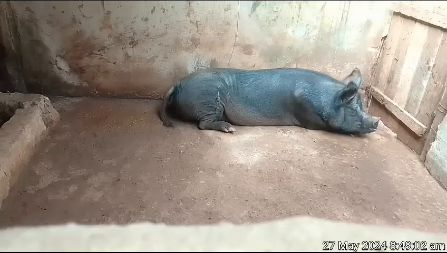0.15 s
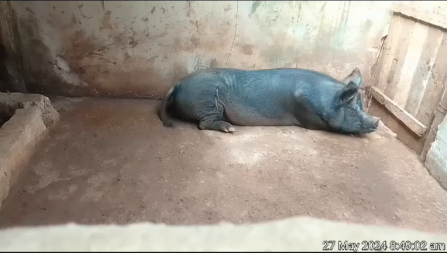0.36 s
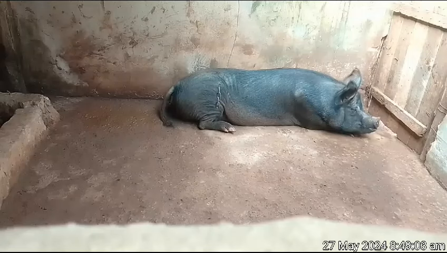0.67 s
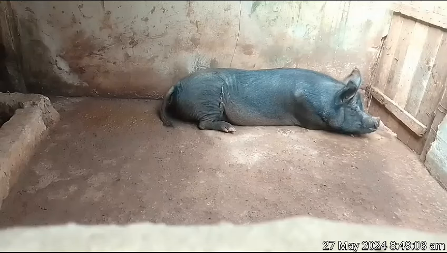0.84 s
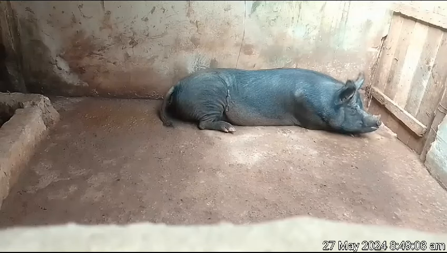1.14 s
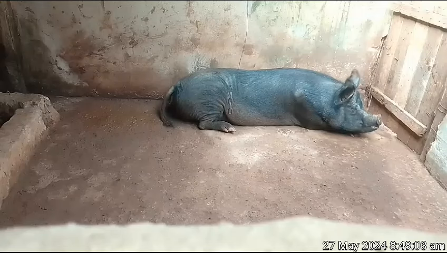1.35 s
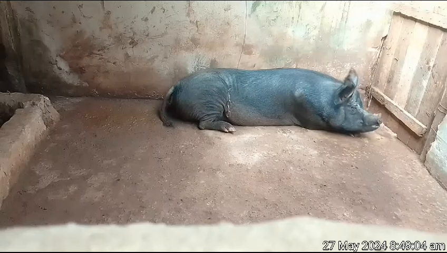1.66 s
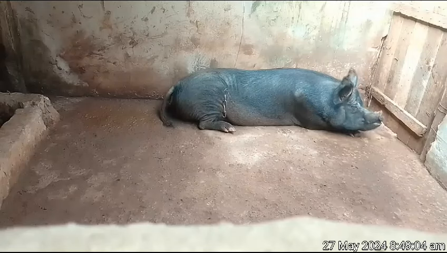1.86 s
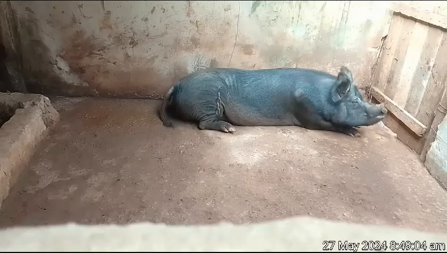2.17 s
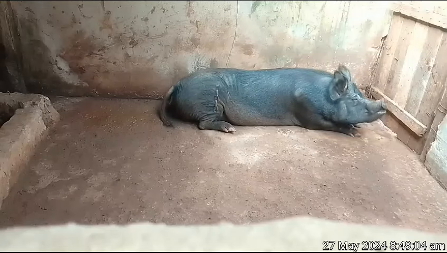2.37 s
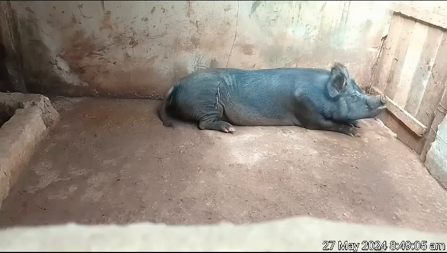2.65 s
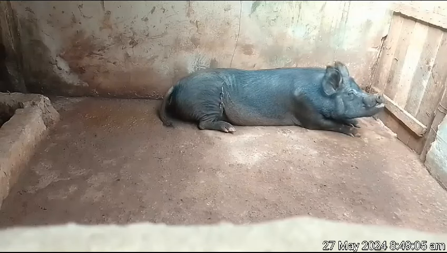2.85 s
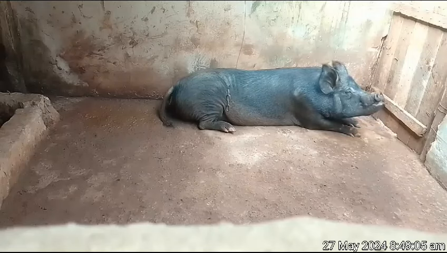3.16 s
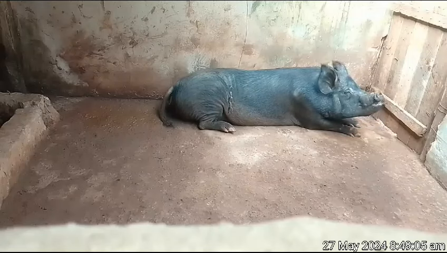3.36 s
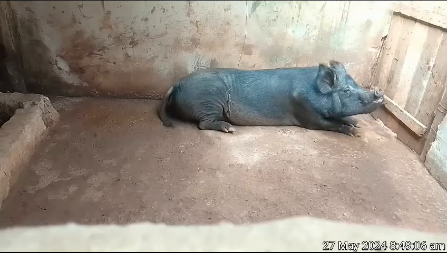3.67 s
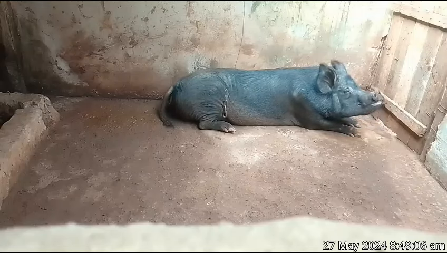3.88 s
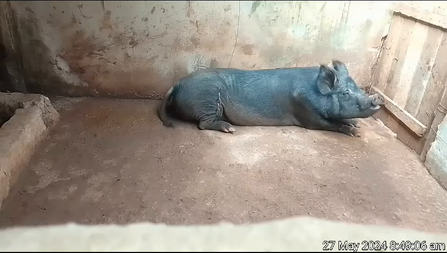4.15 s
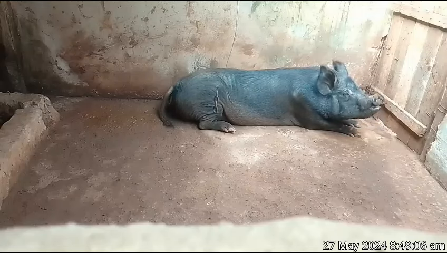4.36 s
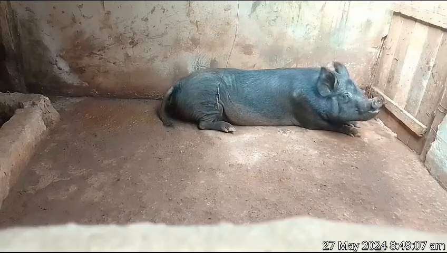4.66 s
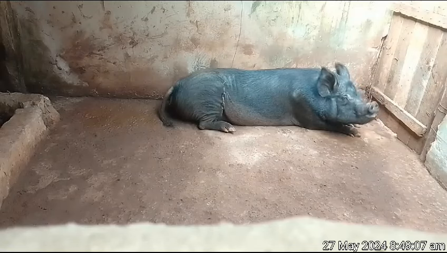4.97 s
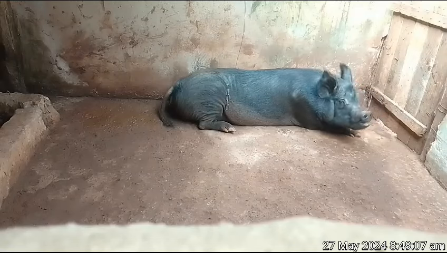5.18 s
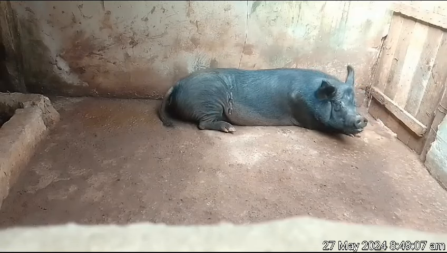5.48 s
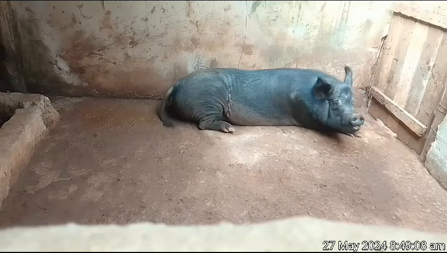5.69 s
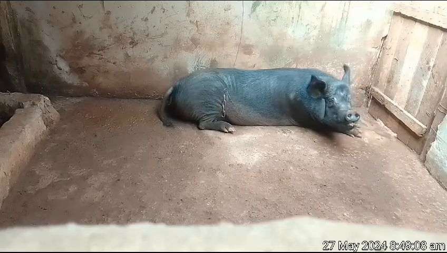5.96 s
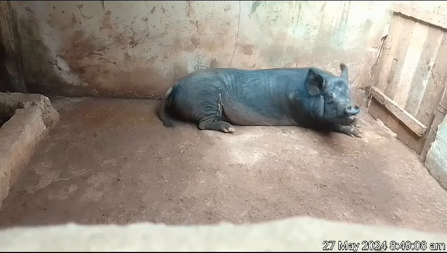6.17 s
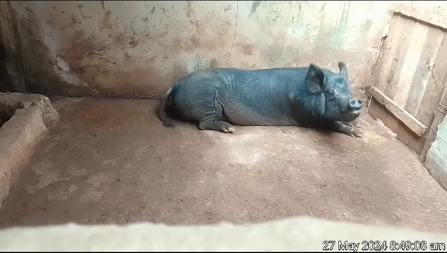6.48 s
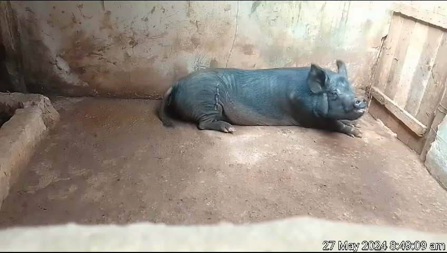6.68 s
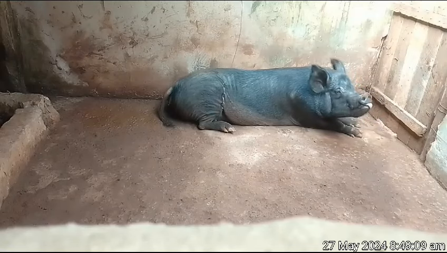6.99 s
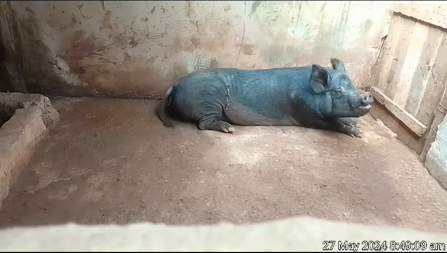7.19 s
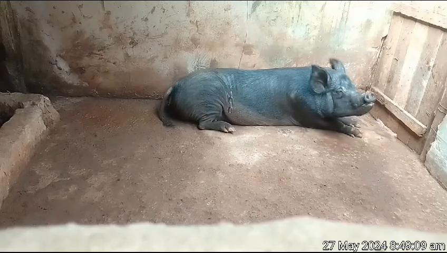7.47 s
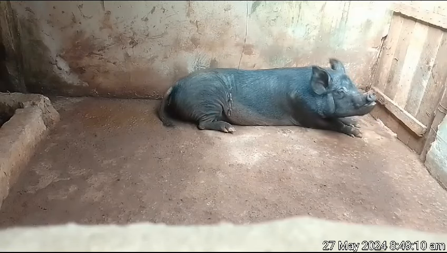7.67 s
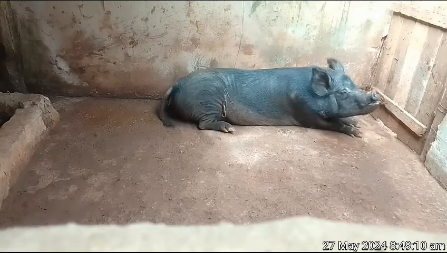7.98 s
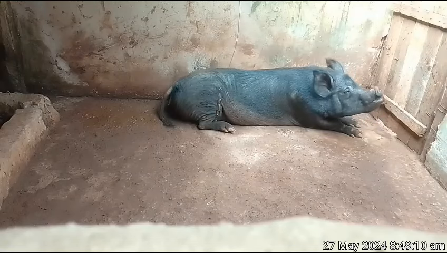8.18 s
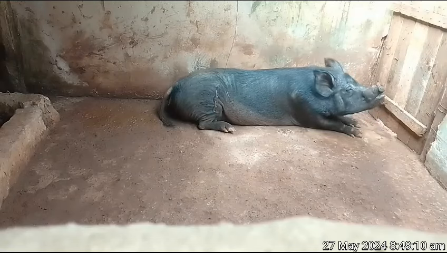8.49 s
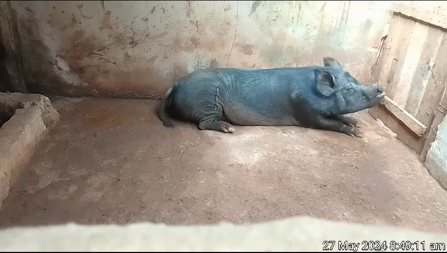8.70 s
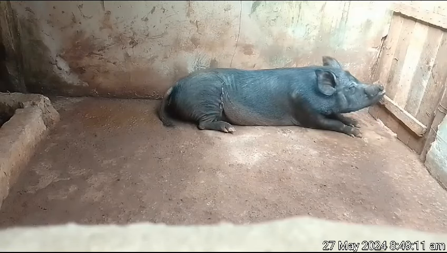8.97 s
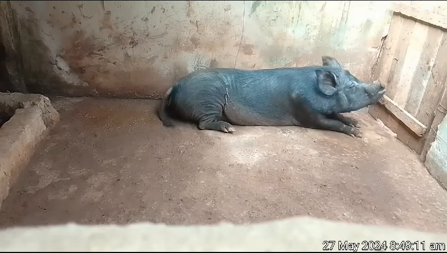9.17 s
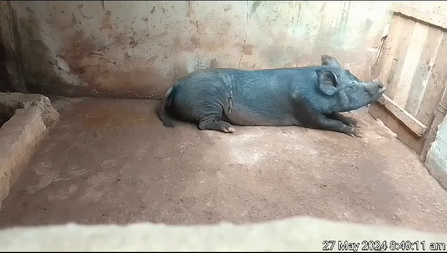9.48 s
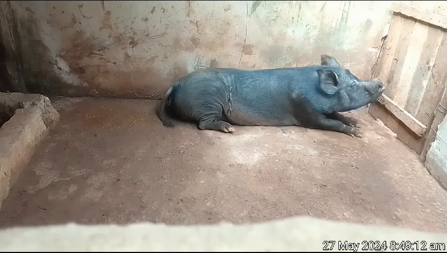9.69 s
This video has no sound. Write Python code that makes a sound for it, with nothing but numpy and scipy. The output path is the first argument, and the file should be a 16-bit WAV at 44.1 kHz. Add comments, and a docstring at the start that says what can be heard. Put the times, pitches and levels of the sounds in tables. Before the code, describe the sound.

One pig grunts continually in a small hard-walled pen: hoarse, breathy, mostly unpitched snorts with a rattling mid-range throat tone, little wet clicks and occasional lip smacks. Early grunts are mixed, one sharp and strong near the first second; the middle is firm and regular, the later ones quieter and rougher with a strong final one. Faint low farm rumble wavers underneath; slightly bright, close phone pickup with half-second room ring.

```python
"""A low, wavering farm murmur is heard first; then a pig gives short, hoarse grunts, two or three a second.
Murmur: filtered noise. Grunt: unevenly timed tissue slaps and puffs of air excite the throat resonances.
Gushes of air mark the pops; short damped tones make the wet rasp and smacks; a few moans have a pitch.
The bare concrete walls of the pen ring for up to half a second, with a fainter, slower tail from the shed."""
import sys
import numpy as np
from scipy import signal
from scipy.fft import rfft, irfft, next_fast_len
from scipy.io import wavfile
from scipy.ndimage import map_coordinates

SR = 44100
rng = np.random.default_rng(int(sys.argv[2]) if len(sys.argv) > 2 else 0)


def unload_wav(signal):
    """Save mono or channel-first audio to the path in sys.argv[1] as 16-bit WAV at rate SR, clipped to [-1, 1]."""
    wavfile.write(
        sys.argv[1],
        SR,
        np.round(np.clip(np.atleast_2d(signal).T, -1, 1) * 32767).astype(np.int16),
    )


N = 433944
TOP_HZ = 15600  # upper band limit


def amp(db):
    """Level: decibels to amplitude gain."""
    return 10 ** (np.asarray(db) / 20)


def unit(x):
    """Normalisation: scale to rms 1."""
    return x / np.sqrt(np.mean(x ** 2) + 1e-20)


def along(points, hz):
    """Logarithmic frequency scale: interpolate (Hz, value) points along it."""
    point_hz, values = np.transpose(points)
    return np.interp(np.log(hz + 1), np.log(point_hz), values)


def wobble(rate_hz):
    """Random modulation: a smooth curve through rate_hz independent normal values a second."""
    knots = rng.standard_normal(1000)
    return map_coordinates(knots, [np.arange(N) / SR * rate_hz], mode="mirror")


# Fixed resonances: those of snout and pen, and the phone microphone's broad one near 9 kHz.
# Width is the full width at half the lift in dB. Columns: centre_hz, width_hz, lift_db
RESONANCES = [(111, 28, 2), (157, 5, -3.5), (266, 7.2, 2.5), (334.3, 3, 6.5), (463.4, 27, 2),
              (557.3, 6.2, 7.5), (631, 11.6, 4.5), (664, 49, -5.5), (864, 5.9, 0), (958, 39, 4.5),
              (1147, 150, 5), (1454, 360, 5.5), (1826, 110, 2.5), (9250, 3000, 10.5)]


def fixed_resonances(hz):
    """Resonance: each fixed mode lifts or dips a bell-shaped band (result in dB)."""
    return sum(db / (1 + (2 * (hz - centre) / width) ** 2) for centre, width, db in RESONANCES)


# Relative level of the farm background over time. Columns: time_s, level_db
MURMUR_LEVEL = [(0.05, -59), (0.62, -47.5), (1.2, -56.5), (1.75, -50), (2.28, -53), (2.81, -59),
                (3.37, -60), (3.88, -62.1), (4.3, -49.5), (4.8, -54), (5.37, -58.5), (5.96, -59.5),
                (6.45, -54), (6.87, -57.5), (7.8, -57.5), (8.42, -56), (9.0, -49.7), (9.64, -65)]
# Relative spectrum of the farm background. Columns: frequency_hz, density_db (dB per Hz)
MURMUR_SPECTRUM = [(30, -10), (85, -29.5), (125, -2.5), (175, -2.5), (235, 1.5), (340, 0), (420, 0),
                   (560, -5.5), (720, -12.5), (1500, -41), (4000, -49), (15000, -62)]


def murmur(waver_db, waver_hz):
    """Spectral shaping of noise: a dull, wavering farm background coloured by the fixed resonances."""
    size = next_fast_len(N)
    hz, t = np.fft.rfftfreq(size, 1 / SR), np.arange(N) / SR
    colour = amp(along(MURMUR_SPECTRUM, hz) + fixed_resonances(hz))
    noise = irfft(rfft(rng.standard_normal(size)) * colour, size)[:N]
    level_db = np.interp(t, *np.transpose(MURMUR_LEVEL))
    return unit(noise) * amp(level_db + waver_db * wobble(waver_hz))


def flaps(rate_hz, scatter, size_db, puff_s, air):
    """Aperiodic excitation: tissue slaps shut at uneven intervals, each slap passing a turbulent puff."""
    gaps = np.exp(scatter * rng.standard_normal(6000))
    at = (np.cumsum(gaps / gaps.mean()) * SR / rate_hz).astype(int)
    sizes = amp(size_db * np.clip(rng.standard_normal(len(at)), -2, 2))
    slaps = np.bincount(at[at < N], sizes[at < N], N)
    puff_envelope = signal.lfilter([1], [1, -np.exp(-1 / (puff_s * SR))], slaps)
    puffs = puff_envelope * rng.standard_normal(N)
    air = np.clip(air, 0, 1)  # share of the power carried by the puffs
    return np.sqrt(1 - air) * unit(slaps) + np.sqrt(air) * unit(puffs)


def saliva(pitch_hz, size_db, hiss, count=3500):
    """Damped oscillation: tiny wet clicks, each a few cycles at its own pitch, on a bed of hiss."""
    t = np.arange(128) / SR
    when, pitch, size = rng.random(count), rng.standard_normal(count), rng.exponential(size=count)
    hz = np.minimum(pitch_hz * np.exp(.35 * pitch), TOP_HZ)
    ring = np.sin(2 * np.pi * hz[:, None] * t) * np.exp(-t / .0004)
    clicks = amp(size_db * np.minimum(size, 3))[:, None] * ring
    at = (when * N).astype(int)[:, None] + np.arange(len(t))
    crackle = unit(np.bincount(at.ravel(), clicks.ravel(), N)[:N])
    return unit(crackle + hiss * rng.standard_normal(N))


# One row per grunt: a lead-in, then a push; the last two columns are the throat resonance at start and end.
# Columns: start_s, lead_s, push_s, lead_effort_db, push_effort_db, push_swell_db,
#   chest_db, mouth_db, rasp_db (these three relative to the effort), first_hz, last_hz
GRUNT_ROWS = [ (0.195, 0.14, 0.13, -43, -37.5, 0, -3, -5, -16, 770, 730),
              (0.656, 0.021, 0.155, -40, -42.5, -8, -7, -2.5, -10, 690, 680),
              (0.846, 0.015, 0.1, -22, -22, 2.5, -10, -11, -20, 900, 750),
              (1.2, 0.033, 0.058, -43, -49, -3, -17, -3, -2.5, 850, 804),
              (1.29, 0.21, 0.075, -42.5, -38.5, 10, -7.5, -2.5, -10, 746, 620),
              (1.80, 0.1, 0.19, -39.5, -28, -2, -7, -6.5, -11, 765, 800),
              (2.343, 0.14, 0.15, -30, -23, -6.5, -10.5, -6, -12.5, 769, 890),
              (2.854, 0.13, 0.095, -27, -23.5, 5.5, -11.5, -7, -12.5, 756, 736),
              (3.421, 0.076, 0.18, -33, -24.5, -5.5, -11, -3.5, -11, 830, 720),
              (3.923, 0.05, 0.16, -39.5, -23, -3.5, -9, -3, -11.5, 726, 810),
              (4.385, 0.073, 0.17, -33, -25.5, -9, -8, -6, -13.5, 778, 744),
              (4.883, 0.2, 0.07, -36, -28.5, 3, -5, -4, -10, 815, 724),
              (5.429, 0.03, 0.069, -23, -28.5, 0.5, -18, -5, -13.5, 720, 840),
              (5.561, 0.058, 0.086, -31, -27.5, -5.5, -7, -7, -11, 785, 675),
              (6.007, 0.13, 0.16, -38, -46, -7, -2.5, -2.5, -7.5, 690, 870),
              (6.30, 0.053, 0.23, -41.5, -53, -10, -2.5, -4, -19, 726, 620),
              (6.627, 0.01, 0.13, -27, -34.5, -5, -11, -5.5, -11.5, 820, 850),
              (6.895, 0.018, 0.19, -53, -40.5, -1, -4.5, -2.5, -13.5, 830, 814),
              (7.131, 0.12, 0.19, -33.5, -23.5, -2.5, -7.5, -7, -13, 970, 580),
              (7.828, 0.096, 0.12, -38.5, -29.5, 11.5, -10.5, -6.5, -21.5, 680, 710),
              (8.089, 0.1, 0.072, -35.5, -37.5, -7, -5.5, -3.5, -12, 790, 815),
              (8.459, 0.14, 0.20, -38.5, -38.5, 4, -8, -4.5, -8.5, 900, 715),
              (8.921, 0.01, 0.17, -41, -47.5, -6.5, -4.5, -3, -15, 810, 725),
              (9.111, 0.029, 0.27, -36, -37.5, 1.5, -11, -3.5, -8.5, 705, 740),
              (9.682, 0.027, 0.17, -25.5, -27, 25, -13, -4.5, -11, 734, 890), ]
# Change of register gain (dB) from start to end of a grunt, which turns deeper and wetter.
# Entries: chest_db, throat_db, mouth_db, rasp_db
REGISTER_DRIFT_DB = [1.7, -1.5, -1.8, 1.6]
ATTACK_S, OPEN_S, RELEASE_S = 0.0017, 0.016, 0.016  # onset, step from lead-in to push, letting go
FLUTTER_DB, FLUTTER_HZ = 2, 28.04  # unsteadiness of the effort
SOFT_DB, SOFT_SLOWS_S_PER_DB = -33, 0.0022  # below this lead-in effort the onset slows
WET_LAG_S = 0.0065  # time constant with which the saliva starts crackling


def effort():
    """Amplitude envelope: each register follows a lead-in, a push that swells or sags, and a release."""
    t, gains = np.arange(N) / SR, np.zeros((4, N))
    for s, lead_s, push_s, lead_db, push_db, swell_db, chest, mouth, rasp, *_ in GRUNT_ROWS:
        length = lead_s + push_s
        near = (t > s) & (t < s + length + .5)
        u = t[near] - s
        push = push_db + swell_db * (np.clip((u - lead_s) / push_s, 0, 1) - .5)
        opening = np.clip((u - lead_s) / OPEN_S + .5, 0, 1)
        level = lead_db + (push - lead_db) * opening
        attack_s = ATTACK_S + SOFT_SLOWS_S_PER_DB * max(SOFT_DB - lead_db, 0)
        release = np.exp(-np.maximum(u - length, 0) / RELEASE_S)
        gate = (1 - np.exp(-u / attack_s)) * release
        drift = np.outer(REGISTER_DRIFT_DB, np.minimum(u / length, 1) - .5)
        colour = np.array([chest, 0, mouth, rasp])[:, None] + drift
        voice = gate * amp(level + colour)
        voice[3] *= 1 - np.exp(-u / WET_LAG_S)
        gains[:, near] += voice
    return gains * amp(FLUTTER_DB * wobble(FLUTTER_HZ))


def throat_hz():
    """Moving resonance: the throat frequency glides through each grunt as jaw and tongue move."""
    points = []
    for s, lead_s, push_s, *_, first_hz, last_hz in GRUNT_ROWS:
        points += [(s, first_hz), (s + lead_s + push_s, last_hz)]
    return np.interp(np.arange(N) / SR, *np.transpose(sorted(points)))


def vowel(x, width_hz, lift_db, trim_db):
    """Formant filtering: a one-pole low-pass, carried to the sliding throat frequency, adds a resonance."""
    turn = np.exp(2j * np.pi * np.cumsum(throat_hz()) / SR)
    pole = np.exp(-np.pi * width_hz / SR)
    ring = 2 * np.real(turn * signal.lfilter([1 - pole], [1, -pole], x / turn))
    return amp(trim_db) * (x + amp(lift_db) * ring)


# The throat pops open: relative level of the throat drive; the other registers relative to it.
# Columns: time_s, level_db, chest_db, mouth_db, rasp_db
BURST_ROWS = [(0.269, -34.5, -7, -20, -12), (0.321, -19, -2, -4, -16), (0.851, -8.5, -13, -4, -19),
              (1.302, -35, -9, -3, -14), (1.511, -29, -18, -9, -11.5), (1.859, -22.5, -6, -5.5, -15.5),
              (1.929, -21.5, -14, -1.5, -14), (2.087, -21.5, -8.5, -3, -30), (2.342, -19.5, -3.5, -12, -34),
              (2.372, -18, -9, -7, -24), (2.484, -15, -20, -23, -13.5), (2.855, -16, -8.5, -3.5, -12),
              (2.955, -24, -26, -5, -5), (3.423, -13, -11.5, -7.5, -35), (3.452, -17.5, -19, -24, -38),
              (3.504, -14.5, -19, -18, -37), (3.925, -20.5, -13, -7, -16), (3.977, -10, -28, -6.5, -34),
              (4.007, -8.5, -30, -8, -26), (4.460, -10, -18.5, -14, -19), (4.564, -15.5, -15, -6, -16),
              (4.883, -21.5, -4, -5, -23), (5.100, -9.5, -20, -11.5, -39), (5.151, -19, -26, -12, -37),
              (5.430, -15.5, -21, -10.5, -18.5), (5.652, -18, -17, -15, -25), (6.01, -26.5, -13, -9, -20),
              (6.115, -25.5, 0, -2.5, -14), (6.628, -27.5, 2.5, -2.5, -20), (6.772, -24.5, -24, -8, -26),
              (6.899, -32.5, -18, -4, -12.5), (7.136, -30, -12, -0.5, -17), (7.276, -15.5, -27, -30, -19.5),
              (7.923, -19, -1, -23, -17), (8.173, -17.5, -6.5, -3, -9.5), (8.59, -26, 1.5, -0.5, -15),
              (8.609, -21.5, -2.5, 0.5, -7), (9.113, -19, -3, -9, -17.5), (9.252, -24.5, 0, -32, -12.5),
              (9.483, -20, -14, -32, -16.5), (9.704, -15, -13.5, -7.5, -21.5)]


def bursts(burst_db, slap_db, swell_s):
    """Transient excitation: the throat pops open with a gush of air and one slap at its crest."""
    u = np.arange(SR // 16) / SR / swell_s
    crest = round(swell_s * SR)
    gush = (u * np.exp(1 - u)) ** 2
    drive = np.zeros((4, N + SR))
    for s, db, chest, mouth, rasp in BURST_ROWS:
        pop = gush * rng.standard_normal(len(u))
        pop[crest] += amp(slap_db)
        start = round(s * SR) - crest // 2
        gains = amp(db + burst_db + np.array([chest, 0, mouth, rasp]))
        drive[:, start:start + len(u)] += gains[:, None] * pop
    return drive[:, :N]


# Wet smacks of the mouth, levels relative. Columns: start_s, level_db
SMACK_ROWS = [(0.443, -27), (2.4894, -31), (3.5597, -14.5), (4.0687, -16.5), (4.0844, -20), (5.3582, -43),
              (5.7019, -26.5), (6.4494, -43)]


def smacks(level_db, swell_s):
    """Transient envelope: gain of the brief flurries of crackle when the wet mouth parts."""
    start_s, smack_db = np.array(SMACK_ROWS).T
    u = np.maximum(np.arange(N) / SR - start_s[:, None], 0) / swell_s
    return amp(smack_db + level_db) @ (u * np.exp(1 - np.minimum(u, 50)))


def causal(gain):
    """Minimum phase: the causal response of energy 1 that a gain curve implies, by folded cepstrum."""
    cepstrum = irfft(np.log(np.maximum(gain / gain.max(), 1e-5)))
    half = len(cepstrum) // 2
    cepstrum[1:half] *= 2
    cepstrum[half + 1:] = 0
    response = irfft(np.exp(rfft(cepstrum)))[:half]
    return response / np.linalg.norm(response)


# Long-term colour of the voice. Columns: frequency_hz, density_db (dB per Hz)
VOICE_SPECTRUM = [(35, -69), (80, -50), (118, -27), (265, -14.5), (480, -6.5), (630, -0.5), (830, -5.5),
                  (1320, -8), (1700, -11.5), (2600, -20), (4400, -33), (6230, -34.5), (9250, -32.5),
                  (15400, -43)]
# Borders between chest, throat, mouth and rasp. Entries: border_hz
REGISTER_BORDERS_HZ = [417, 1067, 3170]


def tract(size=16384):
    """Source-filter principle: impulse responses of the four registers, chest, throat, mouth and rasp."""
    hz = np.fft.rfftfreq(size, 1 / SR)
    colour = amp(along(VOICE_SPECTRUM, hz) + fixed_resonances(hz))
    below = [1 / (1 + (hz / edge) ** 7) for edge in REGISTER_BORDERS_HZ]
    power_shares = np.diff([0 * hz, *below, 1 + 0 * hz], axis=0)
    return [causal(colour * np.sqrt(np.abs(share))) for share in power_shares]


def pig():
    """Source and filter: rattle and bursts drive chest, throat and mouth; saliva and bursts the rasp."""
    rattle = flaps(rate_hz=120, scatter=.55, size_db=3.0, puff_s=0.0017, air=0.42)
    crackle = saliva(pitch_hz=8250, size_db=6, hiss=0.87)
    sources = [amp(0.87) * rattle, amp(0.86) * rattle, amp(-0.5) * rattle, amp(-4.5) * crackle]
    held = effort() * sources
    chest, throat, mouth, rasp = held + bursts(burst_db=-0.25, slap_db=13.5, swell_s=.005)
    rasp = rasp + smacks(level_db=-8.5, swell_s=0.0017) * crackle
    throat = vowel(throat, width_hz=266, lift_db=3.5, trim_db=-4.5)
    drives = (chest, throat, mouth, rasp)
    return sum(signal.oaconvolve(drive, response)[:N] for drive, response in zip(drives, tract()))


# Reverberation time (60 dB decay) of the pen. Columns: frequency_hz, t60_s
PEN_DECAY = [(150, 0.38), (400, 0.31), (1000, 0.37), (2800, 0.5), (7300, 0.33), (14000, 0.25)]


def pen(x, direct_db, wall_db, wall_s, tail_db, late_db, count=130):
    """Reverberation: direct sound, wall reflection, diffuse tail redrawn in short overlapping stretches."""
    hz, t, z = signal.stft(rng.standard_normal((count, SR // 2)), SR, nperseg=256)
    fall_db = -60 * t / along(PEN_DECAY, hz)[:, None]
    decay = amp(fall_db) + amp(late_db + fall_db / 2)  # the rest of the shed rings on, faint and slow
    tails = signal.istft(z * decay, SR, nperseg=256)[1]
    hop = N // count + 1
    wet, padded = np.zeros(N + 2 * SR), np.pad(x, (hop, 3 * hop))
    fade = np.sin(np.pi * np.arange(2 * hop) / (2 * hop))  # neighbouring stretches blend at equal power
    for k in range(count + 1):
        tail = tails[k % count]
        stretch = padded[k * hop:(k + 2) * hop] * fade
        ring = signal.fftconvolve(stretch, tail / np.linalg.norm(tail))
        wet[k * hop:k * hop + len(ring)] += ring
    wall = np.pad(x, (round(wall_s * SR), 0))[:N]
    return amp(direct_db) * x + amp(wall_db) * wall + amp(tail_db) * wet[hop:hop + N]


# Brief pitched moans, levels relative. Columns: start_s, length_s, first_hz, last_hz, level_db
MOAN_ROWS = [(4.349, 0.13, 199.8, 320, -35.5), (5.21, 0.14, 129, 127, -50.5), (6.387, 0.22, 357, 389, -50),
             (7.12, 0.16, 146, 141, -47.5), (9.383, 0.056, 580, 560, -45), (9.461, 0.034, 736, 802, -24.5)]


def moans(overtone_db, rough_db, rough_hz):
    """Periodic oscillation: now and then the throat catches a soft, rough pitch with one overtone."""
    out = np.zeros(N + SR)
    for s, length, first_hz, last_hz, db in MOAN_ROWS:
        n = round(length * SR)
        phase = 2 * np.pi * np.cumsum(np.linspace(first_hz, last_hz, n)) / SR
        tone = np.sin(phase) + amp(overtone_db) * np.sin(2 * phase)
        out[round(s * SR):][:n] += amp(db) * np.hanning(n) * tone
    return out[:N] * amp(rough_db * wobble(rough_hz))


def scene():
    """Superposition: the pig in its pen, the farm background and a faint microphone hiss add up."""
    animal = pig() + moans(overtone_db=-17.5, rough_db=2, rough_hz=110.7)
    voice = pen(animal, direct_db=-4.5, wall_db=-24, wall_s=.0047, tail_db=-1.0, late_db=-16)
    hiss = amp(-72.5) * rng.standard_normal(N)
    background = amp(1.55) * murmur(waver_db=-0.8, waver_hz=19)
    return (voice + background + hiss)[None]


def record(dry):
    """Band limiting: the phone sheds the deepest bass and keeps nothing above TOP_HZ."""
    thin = signal.sosfilt(signal.butter(2, 60, "highpass", fs=SR, output="sos"), dry)
    size = next_fast_len(N + 8192)
    kept = np.fft.rfftfreq(size, 1 / SR) < TOP_HZ
    return irfft(rfft(thin, size) * kept, size)[:, :N]


dry = scene()
out = record(dry)
unload_wav(out)
```